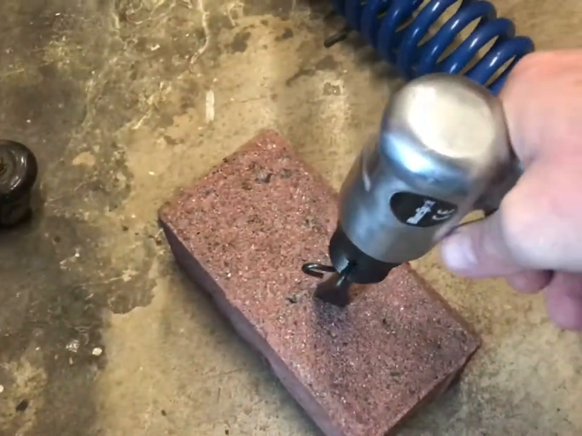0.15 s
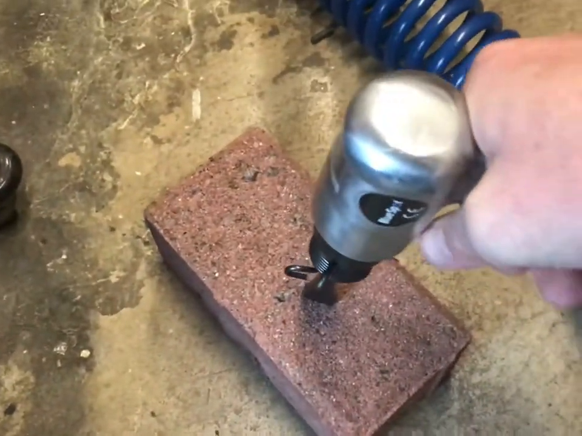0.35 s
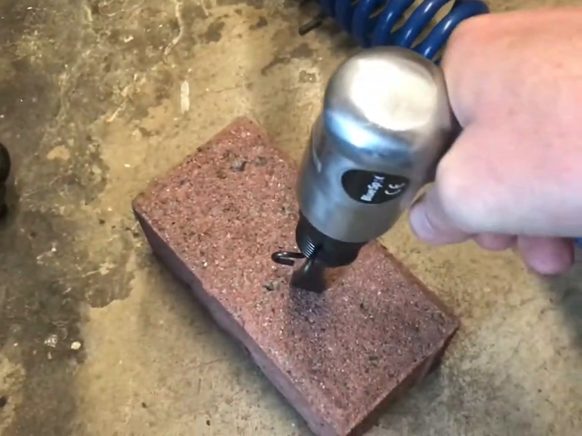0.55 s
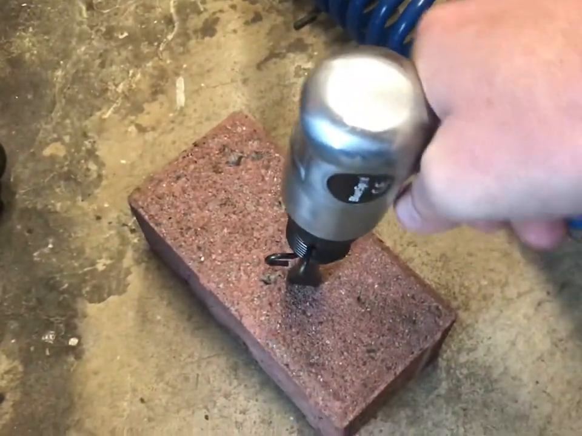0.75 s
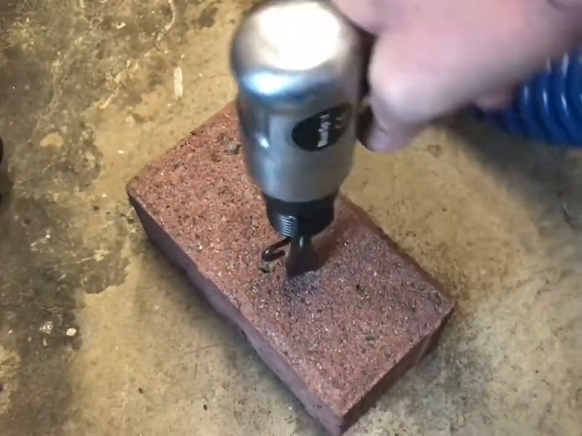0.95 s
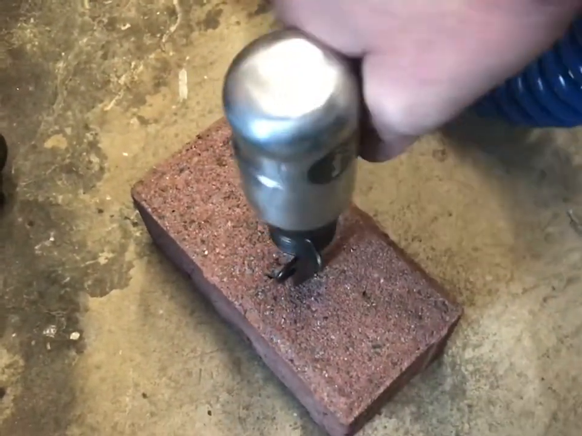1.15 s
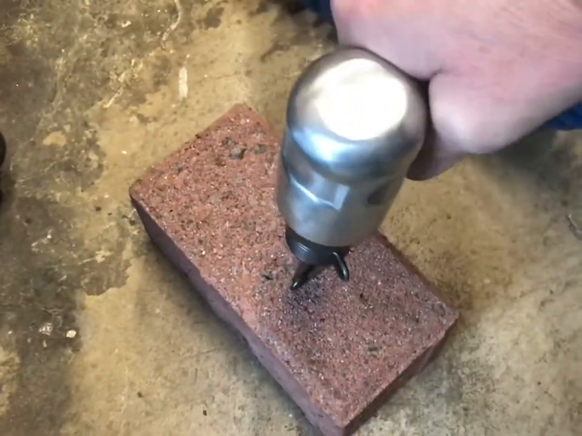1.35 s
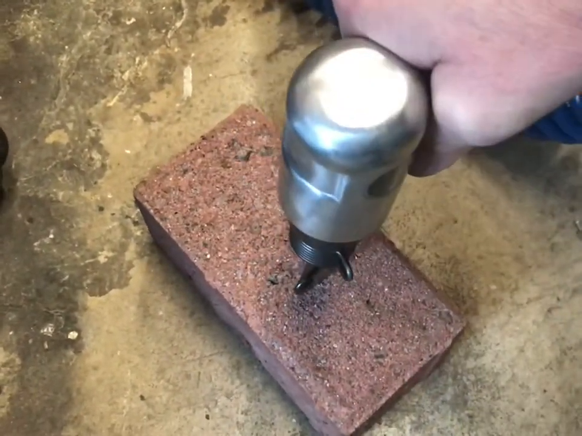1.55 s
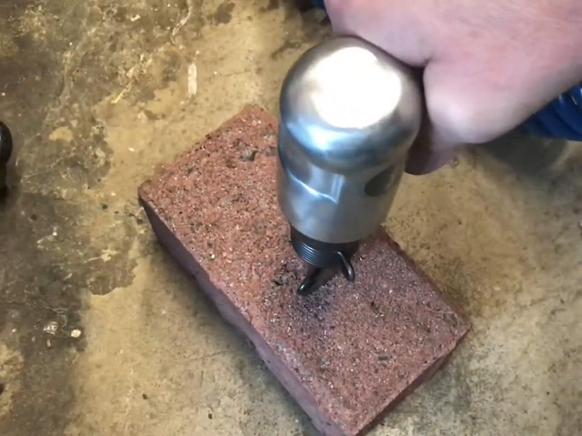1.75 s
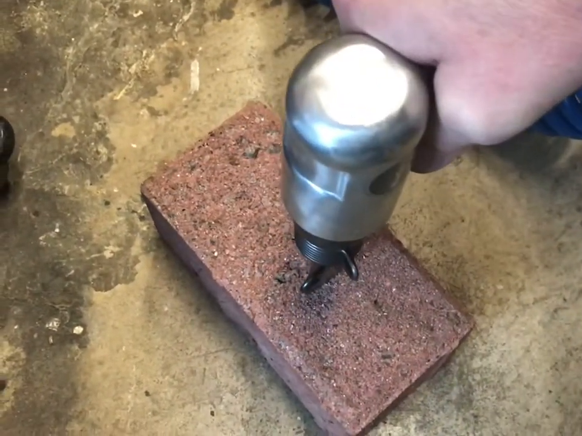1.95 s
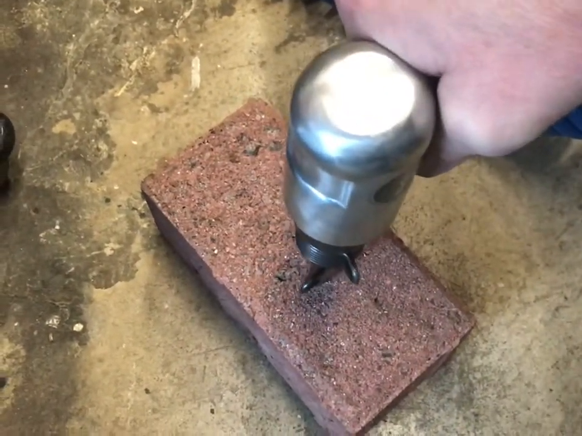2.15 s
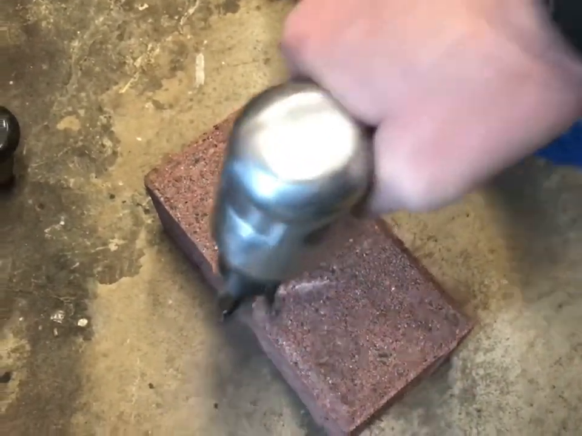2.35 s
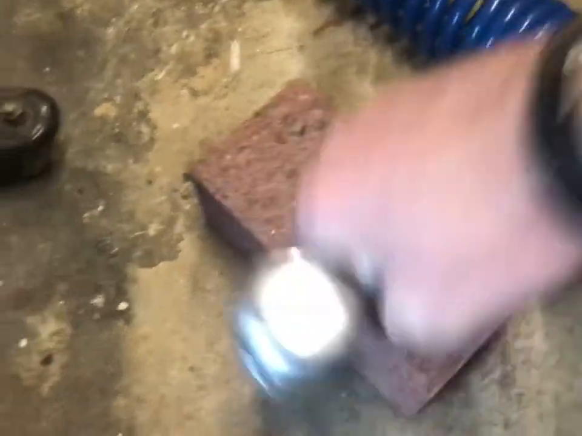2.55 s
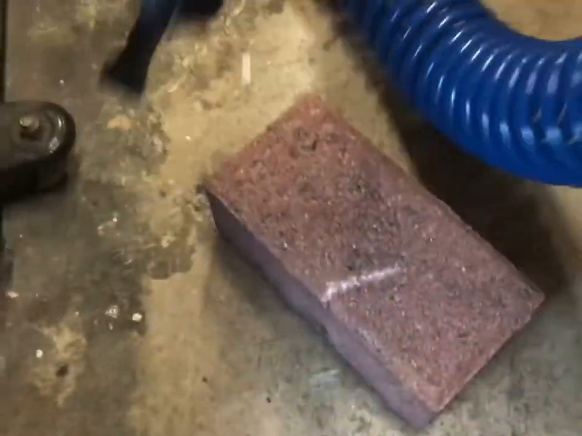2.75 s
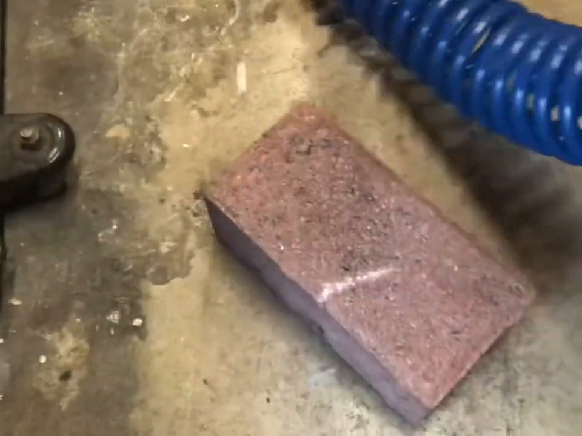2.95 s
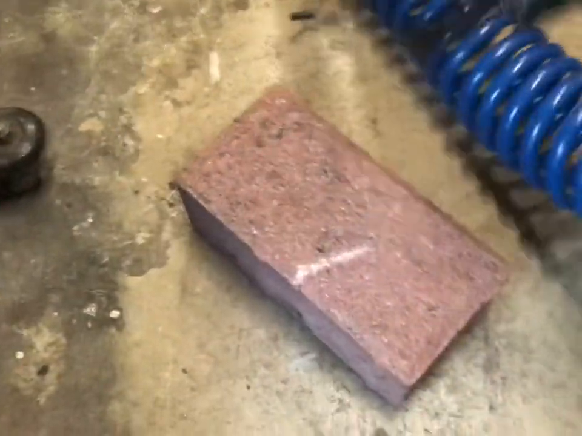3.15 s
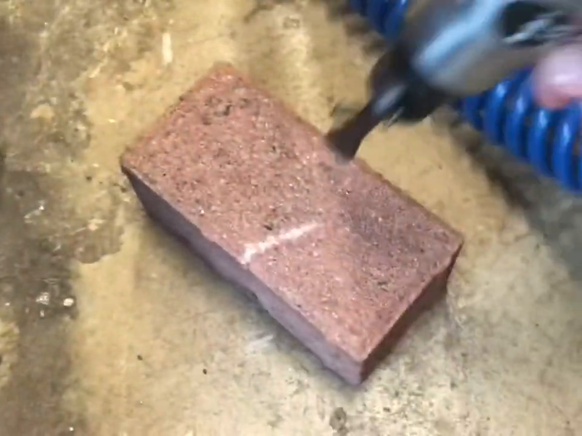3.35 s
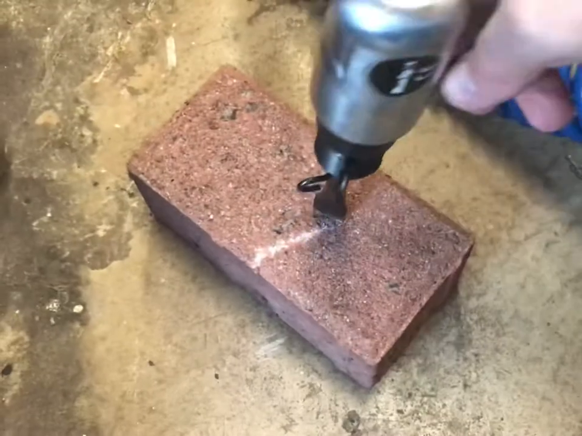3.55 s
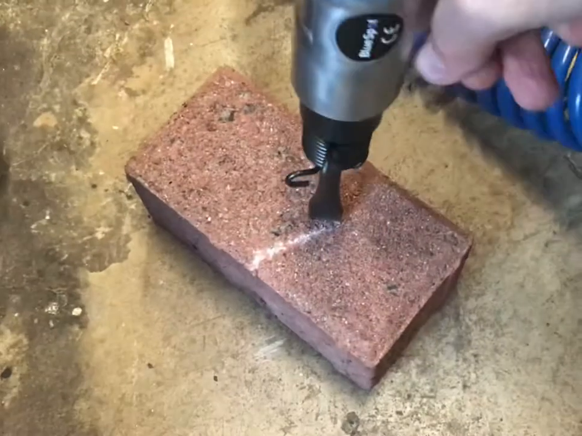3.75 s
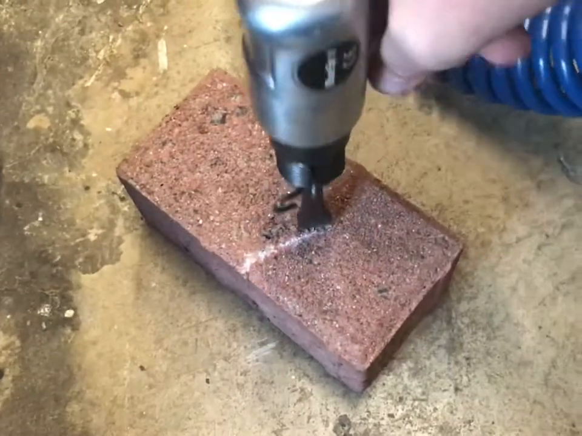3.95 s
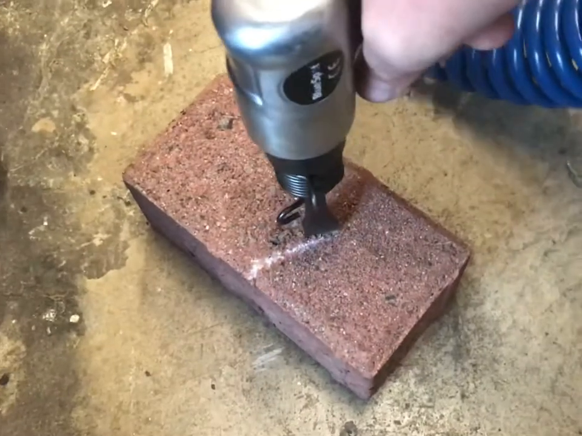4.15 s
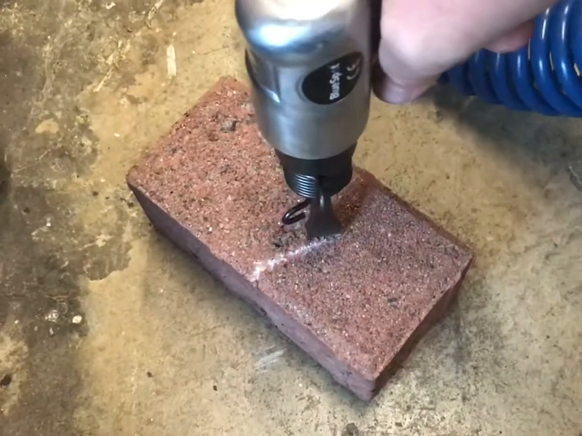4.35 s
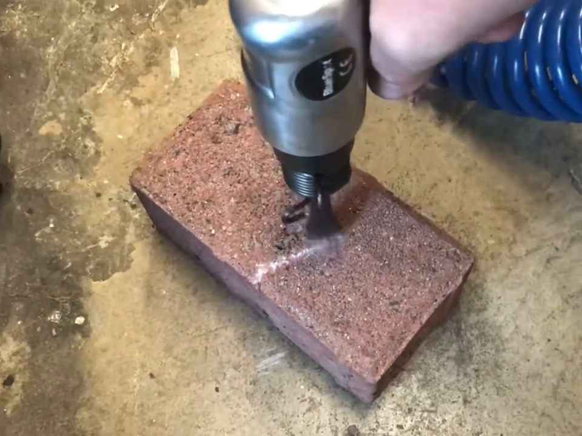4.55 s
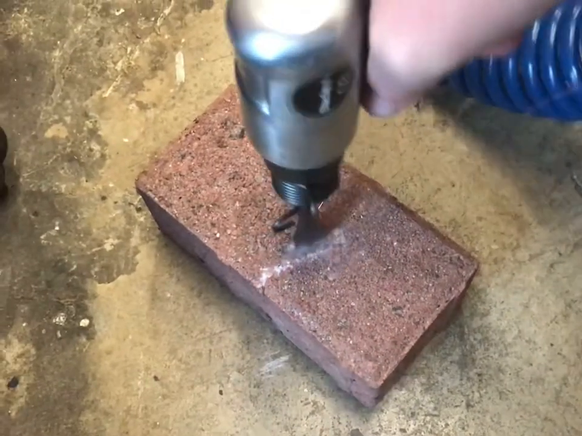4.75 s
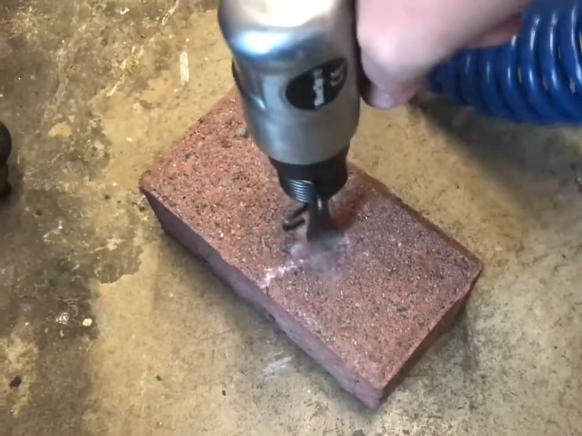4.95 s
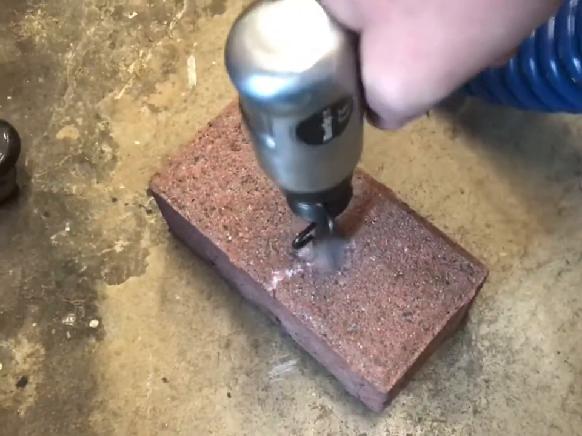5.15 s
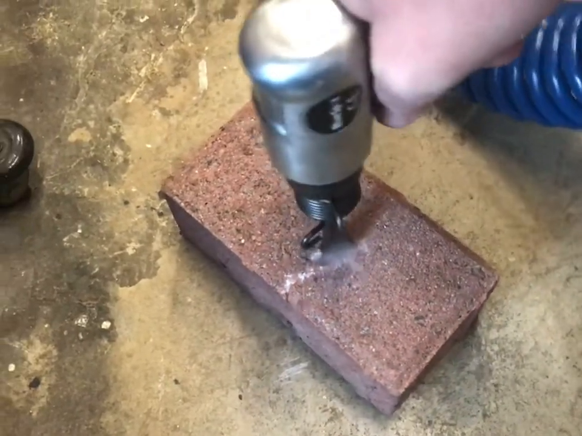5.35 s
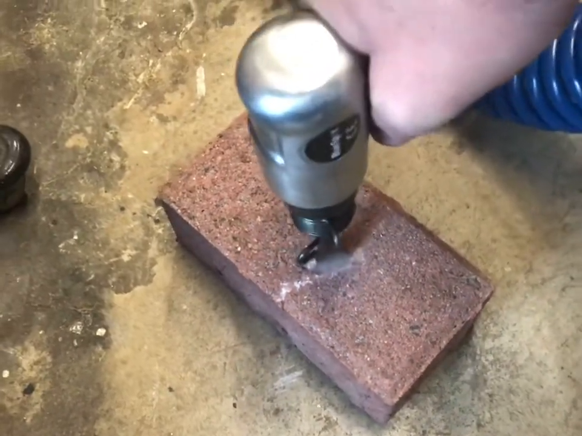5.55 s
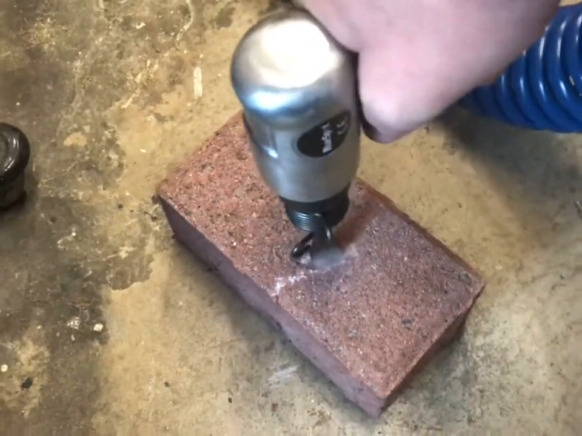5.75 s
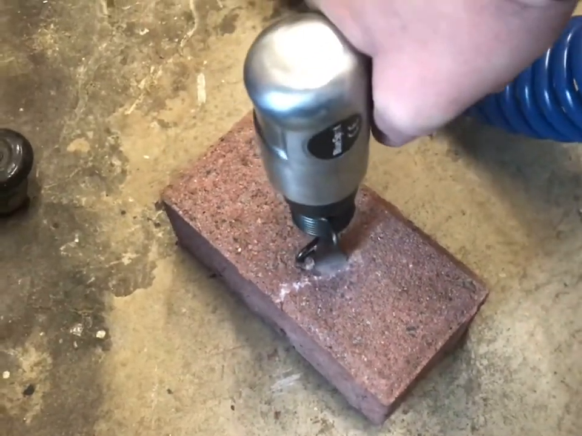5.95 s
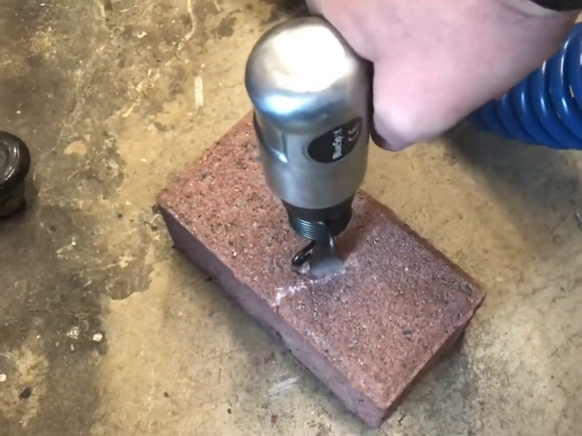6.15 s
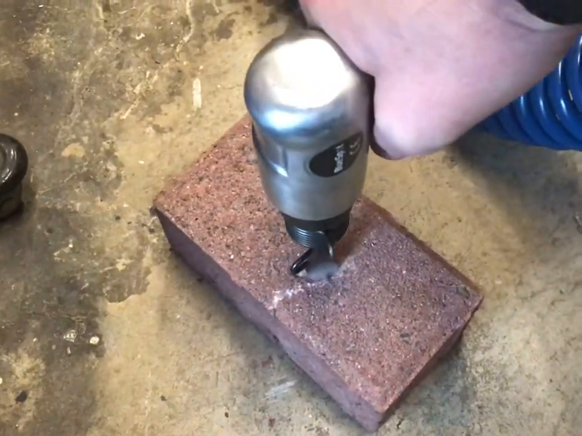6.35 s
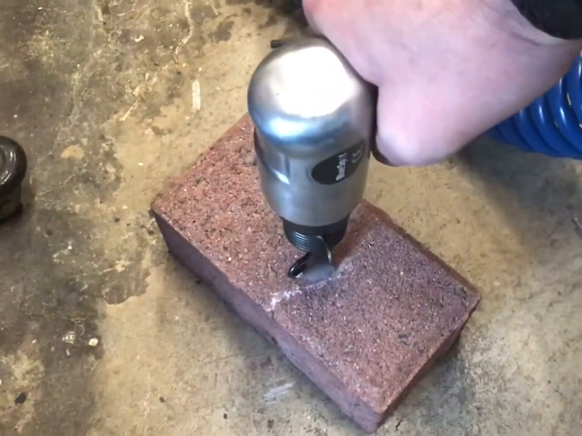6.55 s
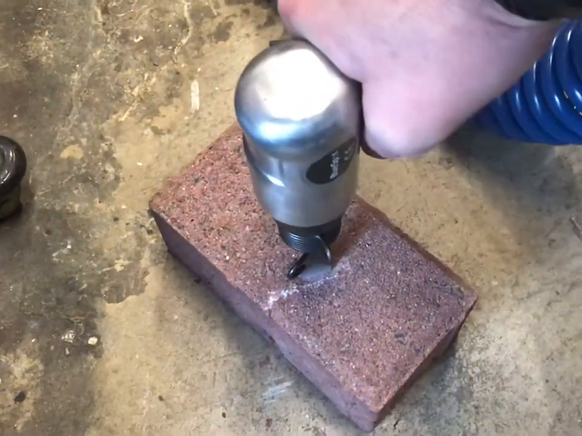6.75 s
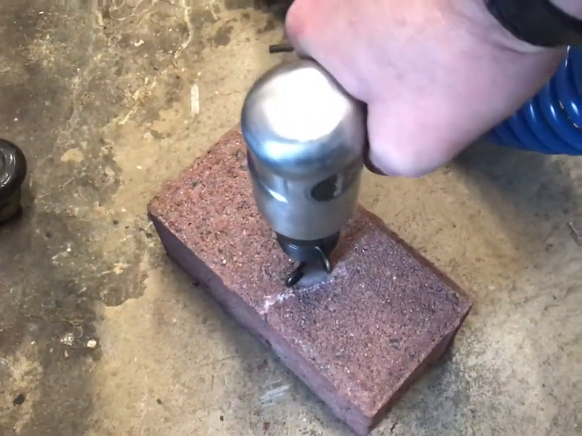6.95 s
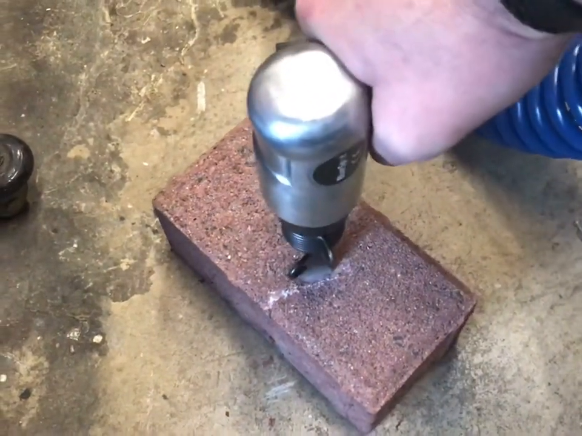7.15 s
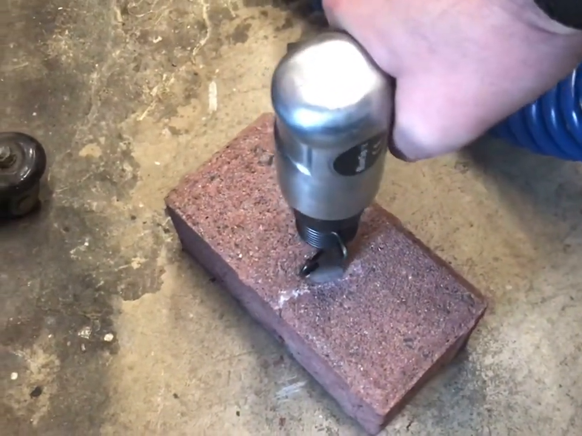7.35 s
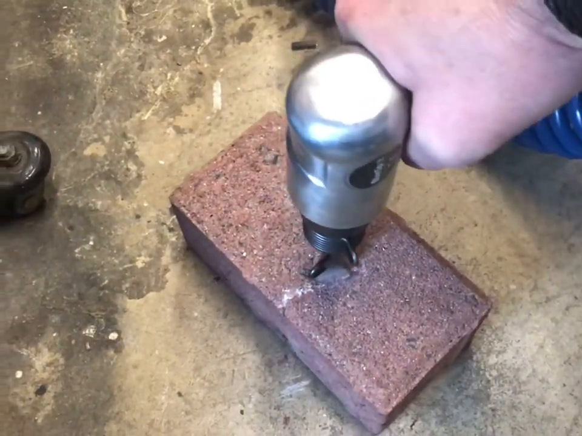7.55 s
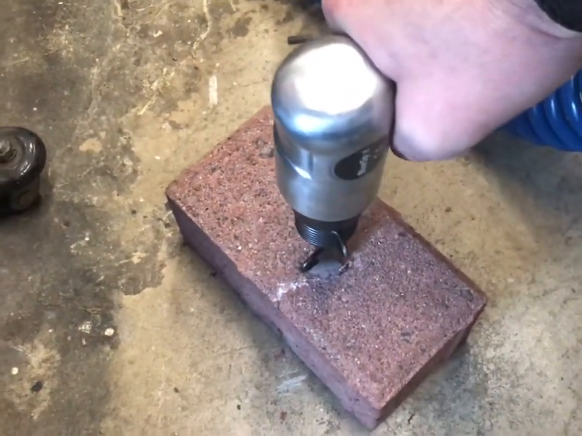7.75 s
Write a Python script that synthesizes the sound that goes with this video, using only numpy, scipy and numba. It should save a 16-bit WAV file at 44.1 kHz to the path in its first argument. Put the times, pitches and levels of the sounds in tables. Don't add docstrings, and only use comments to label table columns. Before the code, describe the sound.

Close, mono phone sound in a concrete-floored garage: bright leaking air throughout, small gritty scrapes and knocks as a steel chisel is placed on brick, a half-second buzzing hammer burst, a pause of hiss swelling back with light taps, then over three seconds of continuous pneumatic hammering, with metallic ringing, brick clatter, floor thud and exhaust puffs buffeting the microphone.

```python
import sys
import numpy as np
from scipy import signal
from scipy.fft import rfft, irfft
from scipy.io import wavfile
from scipy.ndimage import uniform_filter1d, map_coordinates
from numba import njit

SR = 44100
rng = np.random.default_rng(int(sys.argv[2]) if len(sys.argv) > 2 else 0)


def rack_gain(trim_db):
    fader = np.asarray(trim_db, float)
    return 10 ** (fader / 20)


def persist_wave(psi):
    counts = np.round(np.clip(psi, -1, 1) * 32767).astype(np.int16)
    wavfile.write(sys.argv[1], SR, np.atleast_2d(counts).T)


N = 343980
TIME = np.arange(N) / SR

# time_s, strokes_per_s
PISTON = [
    [(2.105, 64.14), (2.25, 59.4), (2.53, 56.39)],
    [(4.4707, 62.62), (4.93, 53.24), (5.14, 58.53), (5.72, 59.69), (6.08, 66.27), (6.69, 64.86),
     (7.03, 67.99), (7.19, 62.73), (7.8, 60.33)],
]
# valve_opening_s, valve_closing_s, blow_db
TRIGGER = [
    (0.0005, 0.017, -19),
    (0.03, 0.004, -18.5),
]
BLOW_DRIFT_DB_PER_S, CRACKED_OPEN_DB, CLOSED_DB = 0.02, -15, -8
# time_s, bite_depth (0-1), brick_contact_db, shank_freedom_db
SEAT = [
    [(2.105, 0, -2, -18), (2.18, 0.02, -1.5, -26), (2.31, .13, -3.5, -23), (2.53, 0.47, -10, -14)],
    [(4.47, 0.3, -16, -5), (4.58, 0, 3, -15), (4.8, 0.27, -8, -14), (5.0, 0.28, -6, -9),
     (5.1, 0.52, -13, -7), (5.7, 0.58, -6.5, -6.5), (5.9, 0.86, -2.5, -6), (6.84, 0.86, -1, -2.5),
     (7.8, 0.85, -5, -7)],
]
# pitch_hz, level_db (per Hz)
STROKE_COLOUR = [(150, -32), (250, -19), (450, 9), (1330, 1), (1750, 1), (2090, -8), (2400, -4.5),
                 (3460, -3.5), (4990, -9.5), (6470, -5.5), (7700, -6.5), (10500, -4.5), (13500, -8),
                 (16000, -8)]
# pitch_hz, width_hz, level_db
BRICK_MODES = [(1080, 91, 1.5), (1700, 220, 7), (2410, 27, 2), (1150, 160, -28)]
BARREL_MODES = [(6980, 190, -0.5), (8860, 300, 1.5), (9420, 97, 7.5), (12800, 1150, 1.5), (15734, 45, -7)]
RATTLE_MODES = [(2386, 127, -1), (2753, 124, -8), (3376, 156, -2.5), (4220, 670, -13.5)]
VALVE_MODES = [(585, 420, 0.5), (1220, 440, -1), (790, 52, -31)]
SLAB_HZ, SLAB_DB, SHANK_HZ = (244.7, 181.3), (-1.5, -3.5), (6570, 6360)
RATTLE_DB, VALVE_DB = (1.5, -7), (23, 18.5)
# start_s, end_s, from_hz, to_hz, level_db
CHATTER = [
    (2.434, 2.53, 3900, 3550, 21),
    (4.8, 5.26, 3370, 4000, 22.5),
]
# start_s, length_s, level_db
SCRAPE = [
    (0.943, 0.01, -26),
    (0.966, 0.16, -27),
    (1.134, .015, -35),
    (1.192, 0.011, -31),
    (1.239, 0.043, -29),
    (1.296, .01, -34),
]
SCRAPE_ATTACK_S, SCRAPE_RELEASE_S = 0.0034, 0.015
# pitch_hz, width_hz, level_db
SCRAPE_MODES = [(576, 300, -9.5), (1250, 290, 0), (1740, 160, 6), (2640, 380, -0.5), (3240, 130, 8),
                (3830, 210, 4), (4370, 250, 4.5), (7200, 17000, -3.5)]
# time_s, peak_db, pitch_hz,
# width_hz
TAPS = [(.003, -50, 40, 12), (.885, -39, 232, 37), (.908, -14, 3730, 400), (1.22, -43, 238, 47),
        (3.505, -16.5, 1300, 1300), (3.592, -20, 1400, 1500), (3.598, -36.5, 200, 110),
        (3.95, -33.5, 242, 65), (3.95, -29, 900, 620), (4.063, -26.5, 500, 740), (4.482, 2, 4000, 11000),
        (4.474, -19, 198, 73), (2.454, 13.5, 4170, 280), (2.472, 18, 2970, 1000), (2.543, -1, 13000, 3000),
        (4.882, 15, 3530, 200), (4.935, 13, 3540, 320), (5.011, 15, 3460, 140), (5.101, 12.5, 3540, 260)]
# time_s, level_db (over the steady blast)
GUSTS = [(2.14, 13.5), (2.446, 11.5), (4.531, 7.5), (4.61, 9.5), (4.87, 5), (5.13, 7.5), (5.3, 2),
         (5.45, 5), (5.57, 7.5), (5.72, 6.5), (5.97, 6), (6.28, 6.5), (6.61, 4), (6.76, 4), (7.2, 8),
         (7.55, 5.5), (7.8, 8)]
BLAST_DB, GUST_S = -27, 0.027
# time_s, aim (at the microphone, 0-1), top_hz, echo_ms (off the brick)
LEAK = [(0, 0.56, 12600, 1.1), (.5, 0.63, 11900, 1.94), (.88, 0.57, 12000, 1.28), (1.0, 0.6, 13200, 1.04),
        (1.35, 0.98, 13400, 1.7), (2.1, 0.97, 13200, 1.17), (2.65, 0.1, 13200, 1.25),
        (3.2, 0.3, 12900, 1.37), (3.4, 0.53, 14800, 1.22), (3.8, 0.61, 13900, 1.24),
        (4.1, 0.68, 13000, 1.27), (4.47, .55, 12800, 1.6)]
# pitch_hz, level_db (per Hz)
LEAK_COLOUR = [(24, -53), (40, -20.5), (145, -19), (350, -22.5), (580, -14.5), (750, -18.5), (1200, -3.5),
               (2600, -11), (3100, -2), (4900, -7), (6900, -9), (10400, -4.5), (11500, -1.5), (15800, -2)]
# pitch_hz, width_hz, level_db
LEAK_PEAKS = [(3190, 150, -38), (6090, 550, 2), (6900, 710, 0), (8720, 510, 4), (14800, 510, -43)]
LEAK_DB, WHISTLE_DB, WHISTLE_HZ, TOP_DB = (-21.5, -23.5), (-10.5, 4.5), (3400, 3900), (1.5, 1.5)
# time_s, gain_db
DIVE = [(0.0, -1.0), (0.05, -6), (0.1, -12.5), (0.21, -20.5)]
# time_s, gain_db
CLIMB = [(0.11, -29.5), (0.21, -18), (0.47, -12.5), (0.97, 0)]
GAIN_SAG_DB, DUCKED_DB, TOP_HZ = -2.5, -24.5, 15780


def columns(*tables):
    time_s, *cols = np.concatenate(tables).T
    return [np.interp(TIME, time_s, col) for col in cols]


def between(ends, share):
    return ends[0] + (ends[1] - ends[0]) * share


def unit(x):
    return x / np.sqrt(np.mean(x ** 2))


def noise():
    return rng.standard_normal(N)


def coloured(points):
    hz, db = np.transpose(points)
    shape_db = np.interp(np.log(np.fft.rfftfreq(N, 1 / SR) + 1), np.log(hz), db)
    return unit(irfft(rfft(noise()) * rack_gain(shape_db), N))


@njit
def svf(x, hz, width):
    y, b, l = np.empty(len(x)), 0., 0.
    for i in range(len(x)):
        g, k = np.tan(np.pi * hz[i] / SR), width / hz[i]
        v = (b + g * (x[i] - l)) / (1 + g * (g + k))
        b, l, y[i] = 2 * v - b, l + 2 * g * v, k * v
    return y


def band(x, hz, width):
    centre = np.clip(hz + np.zeros(len(x)), 10, .45 * SR)
    return svf(x + 1e-18, centre, float(max(width, 5)))


def body(x, modes):
    return sum((-1) ** k * rack_gain(db) * band(x, hz, width) for k, (hz, width, db) in enumerate(modes))


def fade(x, tau_s):
    return signal.lfilter([1], [1, -np.exp(-1 / (tau_s * SR))], x)


def walk(rate):
    k = int(SR / rate)
    held = np.repeat(rng.standard_normal(N // k + 1), k)
    return unit(uniform_filter1d(uniform_filter1d(held, k), k)[:N])


def impulses(times, sizes):
    at = (times * SR).astype(int)
    return np.bincount(at[at < N], sizes[at < N], N)


def chisel():
    times = stroke_times()
    chance = rng.standard_normal((5, len(times)))
    period = np.clip(np.diff(times, append=times[-1] + .018), .014, .019)
    times = times + .0004 + .0001 * chance[0]
    flip = times - .3 * (period - .0145)
    flip_back = flip + .41 * period
    blow_size, return_size, flip_size = rack_gain(chance[1]), rack_gain(1.5 * chance[3]), rack_gain(1.2 * chance[4])
    strokes = impulses(times, blow_size)
    rebound = impulses(flip_back + .0003 * chance[2], return_size)
    pops = impulses(flip, flip_size) + rack_gain(-8) * impulses(flip_back, return_size)
    shoves = impulses(flip, rack_gain(chance[4]))

    running = fade(strokes, .03)
    size = rack_gain(pressure_db() - DUCKED_DB) * np.clip(.5 + 1.5 * np.roll(running, 1), 0, 1)
    push = 1.2 * size
    blow, rebound = strokes * size, rebound * size
    crack = fade(fade(blow, .00035), .0005) / (.00022 * SR)
    crack = crack + rack_gain(-14) * fade(rebound, .0022)
    vent = fade(fade(blow, 0.002), 0.007) / (0.0024 * SR)
    hit = np.roll(blow, 30) + rack_gain(-12) * rebound

    bite, brick_db, ring_db = columns(*SEAT)
    bright = stroke_air(crack, vent) + barrel(crack) + rattle(crack, vent, bite)
    bright = bright + shank(hit, bite, ring_db) + spring(crack)
    heavy = brick(hit, crack, brick_db) + slab(shoves * push, bite) + valve(pops * push, bite)
    building = np.minimum(uniform_filter1d(running, 1200, origin=599), 1.8 * running ** 2)
    return bright, heavy, building


def stroke_times():
    times = []
    for speed in PISTON:
        on = (TIME >= speed[0][0]) & (TIME < speed[-1][0])
        count = np.cumsum(columns(speed)[0][on]) / SR
        times.append(np.interp(np.arange(int(count[-1]) + 1), count, TIME[on]))
    return np.concatenate(times)


def pressure_db():
    rows = []
    for speed, (open_s, close_s, db) in zip(PISTON, TRIGGER):
        start, stop = speed[0][0], speed[-1][0]
        end_db = db + BLOW_DRIFT_DB_PER_S * (stop - start)
        rows += [(start, db + CRACKED_OPEN_DB), (start + open_s, db)]
        rows += [(stop - close_s, end_db), (stop, end_db + CLOSED_DB)]
    return columns(rows)[0]


def stroke_air(crack, vent):
    air = (rack_gain(11.5) * crack + rack_gain(4.5) * vent) * coloured(STROKE_COLOUR)
    return air - .85 * band(air, 600, 1500)


def barrel(crack):
    return rack_gain(16.5) * body(crack * noise(), BARREL_MODES)


def rattle(crack, vent, bite):
    shake = (crack + rack_gain(-4.5) * vent) * noise()
    return rack_gain(between(RATTLE_DB, bite) + 18.5) * body(shake, RATTLE_MODES)


def shank(hit, bite, ring_db):
    ring_hz = between(SHANK_HZ, bite)
    return rack_gain(ring_db + 48.0) * band(band(hit, ring_hz, 73), ring_hz, 400)


def spring(crack):
    out = 0
    for start, end, from_hz, to_hz, db in CHATTER:
        share = np.clip((TIME - start) / (end - start), 0, 1)
        swell = np.sqrt(np.sin(np.pi * share).clip(0))
        out = out + rack_gain(db) * swell * band(crack * noise(), between((from_hz, to_hz), share), 280)
    return out


def brick(hit, crack, brick_db):
    return rack_gain(brick_db + 32.5) * body(hit + rack_gain(-22.5) * crack * noise(), BRICK_MODES)


def slab(shove, bite):
    hz = between(SLAB_HZ, bite)
    thud = band(shove, hz, 36.0)
    thud = thud - rack_gain(-7.5) * band(shove, 2 * hz, 52.5) - rack_gain(-10) * band(shove, 0.605 * hz, 25)
    return rack_gain(between(SLAB_DB, bite) + 45.5) * thud


def valve(pops, bite):
    return rack_gain(between(VALVE_DB, bite)) * body(fade(pops, 0.000067), VALVE_MODES)


def scrape():
    grit = noise() * rack_gain(1.8 * rng.exponential(size=N)) * rack_gain(1.2 * walk(120))
    drag = 0
    for start, length, db in SCRAPE:
        rise = np.clip((TIME - start) / SCRAPE_ATTACK_S, 0, 1)
        fall = np.exp(-np.clip(TIME - start - length, 0, 1) / SCRAPE_RELEASE_S)
        drag = drag + rack_gain(db) * rise * fall
    return rack_gain(6.5) * drag * unit(body(grit, SCRAPE_MODES))


def taps():
    out = np.zeros(N)
    length = SR // 8
    for start, peak_db, hz, width in TAPS:
        burst = rng.standard_normal(length) * np.exp(-np.arange(length) / (0.0015 * SR))
        knock = band(band(burst, hz, 3 * width), hz, width)
        at = int(start * SR)
        out[at:at + length] += rack_gain(peak_db) * knock / np.abs(knock).max()
    return out


def buffet(running):
    gust = band(band(noise(), 74, 97), 55, 60) + rack_gain(1.5) * band(noise(), 83, 114)
    puffs_db = sum(db * np.exp(-((TIME - s) / GUST_S) ** 2) for s, db in GUSTS)
    level_db = BLAST_DB + puffs_db - DUCKED_DB + 0.71 * walk(25) - 8
    return rack_gain(level_db) * running * unit(gust)


def leak():
    aim, top_hz, echo_ms = columns(LEAK)
    base = coloured(LEAK_COLOUR) * rack_gain(0.52 * walk(29.9))
    peaks = rack_gain(-8.5 + 1.2 * walk(1.7)) * unit(body(noise(), LEAK_PEAKS))
    whistle = unit(band(noise(), between(WHISTLE_HZ, aim), 318))
    whistle = rack_gain(-9 + between(WHISTLE_DB, aim) + 0.57 * walk(11)) * whistle
    top = unit(band(band(noise(), top_hz, 4000), top_hz, 4000))
    top = rack_gain(-8.5 + between(TOP_DB, aim) + 1.4 * walk(9)) * top
    jet = base + peaks + whistle + top

    def echo(delay_ms):
        return map_coordinates(jet, [(TIME - delay_ms / 1000) * SR], order=3)

    off_tool, off_brick, off_floor = echo(np.full(N, .4)), echo(echo_ms), echo(2.85 + .02 * walk(2))
    return rack_gain(between(LEAK_DB, aim) - 2.5) * (jet + .25 * off_tool + .24 * off_brick + .2 * off_floor)


def garage(x, near_db):
    t = TIME[:SR]

    def fall(t60_s):
        return np.exp(-np.log(1000) * t / t60_s)

    near = rack_gain(near_db) * rng.standard_normal(SR) * fall(0.34)
    far = rack_gain(-48) * band(rng.standard_normal(SR), 1500, 4000) * fall(.35)
    mode = rack_gain(-77) * np.sin(2 * np.pi * 113 * t) * fall(0.75)
    return x + signal.fftconvolve(x, (near + far + mode) * (t > .003))[:N]


def scene():
    bright, heavy, running = chisel()
    mono = garage(heavy, near_db=-44)
    mono = mono + garage(bright + scrape() + taps(), near_db=-40.5)
    mono = mono + buffet(running) + leak()
    return np.array([mono, mono])


def phone_gain_db():
    rows = []
    for speed in PISTON:
        start, stop = speed[0][0], speed[-1][0]
        rows += [(start + s, db) for s, db in DIVE]
        rows += [(stop, DIVE[-1][1] + GAIN_SAG_DB)]
        rows += [(stop + s, db) for s, db in CLIMB]
    return columns(rows)[0]


@njit
def limit(x, top, release):
    y, e = np.empty(len(x)), 0.
    for i in range(len(x)):
        e = max(abs(x[min(i + 8, len(x) - 1)]), abs(x[i]), e * release)
        y[i] = x[i] * min(1., top / (e + 1e-9))
    return y


def roll_off(x):
    return signal.sosfilt(signal.butter(12, 16890, fs=SR, output="sos"), x)


def record(dry):
    mono = dry[0] - .42 * band(dry[0], 10550, 800)
    mono = signal.sosfilt(signal.butter(2, 38, "high", fs=SR, output="sos"), mono)
    mono = limit(mono * rack_gain(phone_gain_db()), 0.86, np.exp(-1 / (0.004 * SR)))
    mono = signal.sosfilt(signal.ellip(8, .2, 70, TOP_HZ, fs=SR, output="sos"), mono)
    return roll_off(np.array([mono, mono]))


dry = scene()
out = record(dry)
persist_wave(out)
```